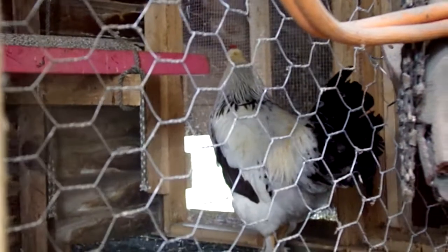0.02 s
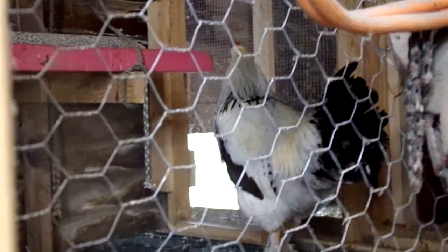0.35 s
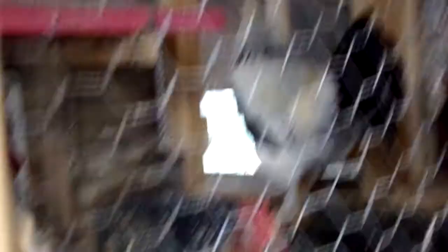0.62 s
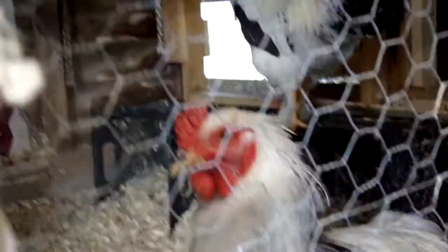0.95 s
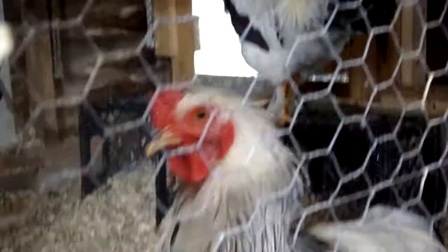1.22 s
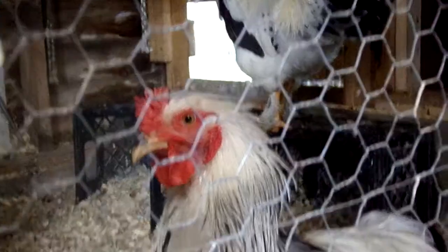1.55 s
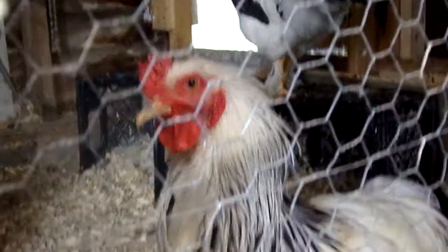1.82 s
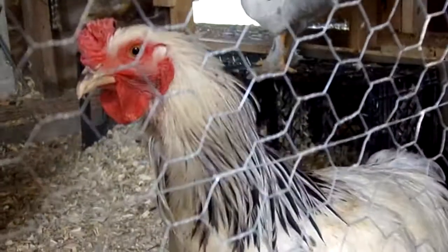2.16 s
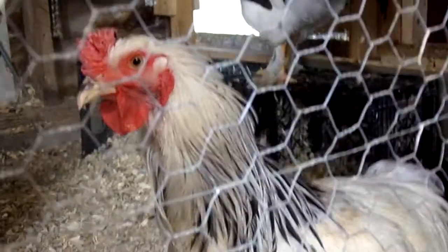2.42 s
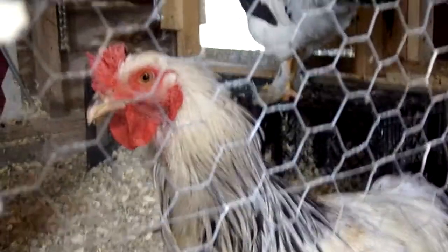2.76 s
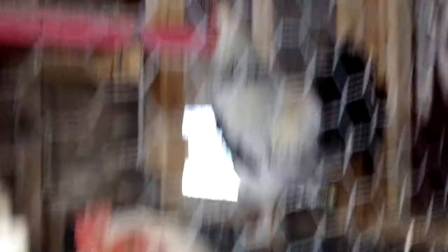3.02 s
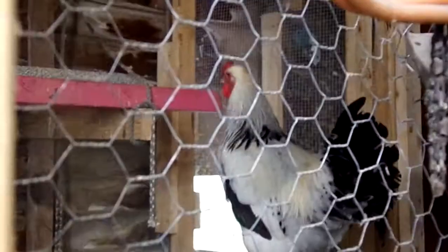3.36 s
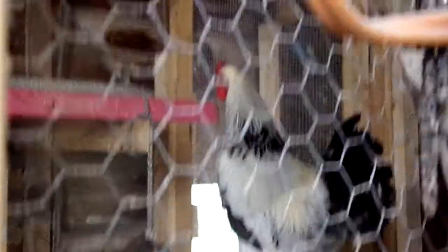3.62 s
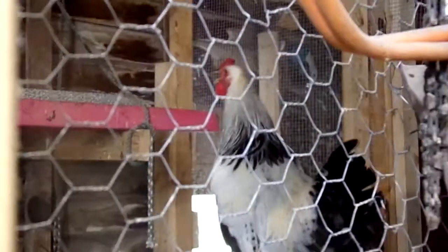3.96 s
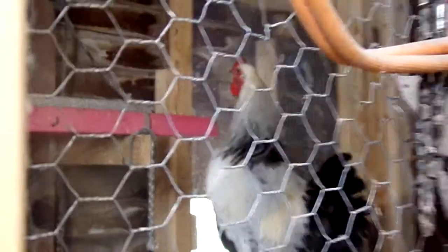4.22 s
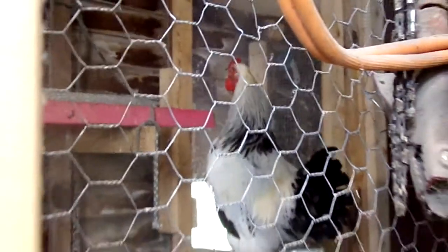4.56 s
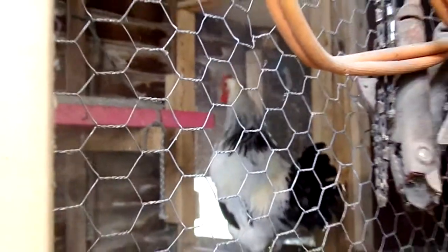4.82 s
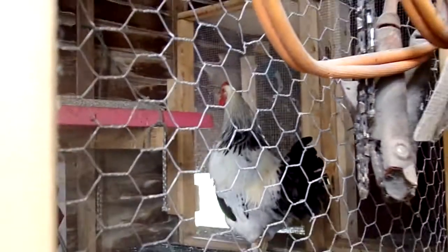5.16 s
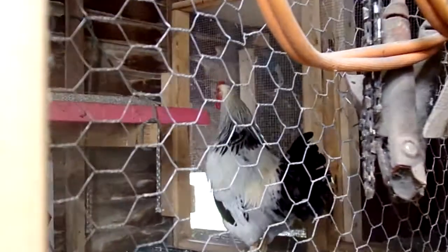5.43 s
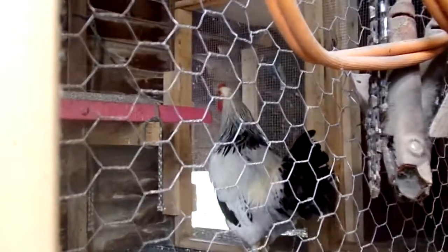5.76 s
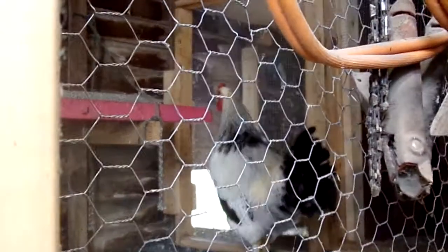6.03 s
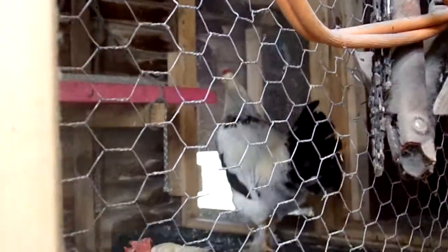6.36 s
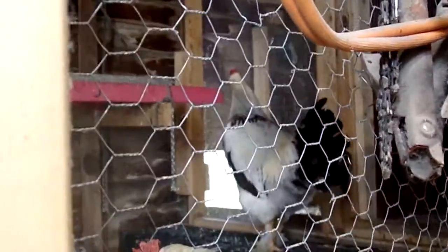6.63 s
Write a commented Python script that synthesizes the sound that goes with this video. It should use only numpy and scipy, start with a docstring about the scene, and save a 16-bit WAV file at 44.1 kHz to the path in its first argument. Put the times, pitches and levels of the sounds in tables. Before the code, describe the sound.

A steady, quiet low noise with a faint hum runs for the whole seven seconds or so, inside a small wooden coop. Right at the start there is a soft, dull bump on the boards. At about 2.5 seconds come two faint, thin falling whistles, the first very short. At about 3.8 seconds a rooster, a step or two from the microphone, begins one loud, harsh crow. It opens with two short arching syllables, moves into a rough rasp from 4.2 to 4.6 seconds, then flips quickly between clear notes and rasps. From about 5.6 seconds it holds a clearer note that sags in pitch and closes with a short rasp at 6 seconds. The coop adds a brief, close reverberation. A small wooden tick sounds at about 6.6 seconds over the continuing background.

```python
"""A rooster crows once in a small wooden coop, a step or two away.
His syrinx is a nonlinear oscillator: periodic motion gives clear harmonic notes, chaotic motion a
harsh rasp shaped by the throat's resonances. He flips between the two, and the boards ring briefly.
Behind him: steady low noise with a hum, a dull bump at the start, two faint falling whistles
and a small tick near the end."""
import sys
import numpy as np
from scipy import signal
from scipy.fft import rfft, irfft
from scipy.io import wavfile
from scipy.ndimage import uniform_filter1d, minimum_filter1d

SR = 44100
rng = np.random.default_rng(int(sys.argv[2]) if len(sys.argv) > 2 else 0)


def inscribe(sig):
    """Save sig as 16-bit PCM at rate SR to the path in sys.argv[1].

    A 1-D sig is mono; a 2-D sig holds one channel per row.
    Samples are clipped to [-1, 1] before scaling.
    """
    pcm = np.round(np.clip(np.atleast_2d(sig).T, -1, 1) * 32767)
    wavfile.write(sys.argv[1], SR, pcm.astype(np.int16))


N = 298998

# formants of the open throat: (frequency [Hz], width [Hz], relative level [dB])
OPEN_FORMANTS = [(610, 53, -2.5), (760, 147, -3.5), (1120, 260, -9), (1306, 58, 4), (1454, 260, -6.5),
                 (1820, 190, -8), (2130, 680, -22.5), (2737, 118, -16.5), (4090, 210, -12.5),
                 (4987, 370, -21), (5920, 220, -26), (6830, 1200, -35.5), (8580, 670, -44),
                 (13700, 7700, -52)]


def gain_of(db):
    """Amplitude ratio: a factor of ten for every 20 dB."""
    return 10 ** (np.asarray(db) / 20)


def unit_rms(x):
    """Normalisation to a mean power of 1."""
    return x / np.sqrt(np.mean(x ** 2) + 1e-20)


def curve_at(points, hz):
    """Linear interpolation on a log-frequency axis."""
    f, value = np.transpose(points)
    return np.interp(np.log(hz + 1), np.log(f + 1), value)


def add(mix, start_s, sound):
    """Superposition: a sound joins the mix at its start time."""
    part = mix[max(round(start_s * SR), 0):][:len(sound)]
    part += sound[:len(part)]


def faded(x, attack_s, release_s):
    """Trapezoidal envelope: linear attack, hold, linear release."""
    t = np.arange(len(x)) / SR
    return x * np.minimum(t / attack_s, 1) * np.minimum(t[::-1] / release_s, 1)


def wander(rate_hz, size):
    """Random modulation: noise of rms 1, low-passed by a Gaussian of width rate_hz."""
    points, step = 2 ** 14, 16
    hz = np.fft.rfftfreq(points, step / SR)
    slow = unit_rms(irfft(rfft(rng.standard_normal(points)) * np.exp(-(hz / rate_hz) ** 2)))
    return np.interp(np.arange(size) / step % points, np.arange(points), slow)


def coloured(x, response, size=4096):
    """Minimum-phase filter: the phase follows from the gain response(hz) by a Hilbert transform."""
    hz = abs(np.fft.fftfreq(size, 1 / SR))
    log_gain = np.log(np.maximum(response(hz), 1e-5))
    taps = np.fft.ifft(np.exp(np.conj(signal.hilbert(log_gain)))).real
    return signal.oaconvolve(x, taps[:size // 2])[:len(x)]


def background(noise_db=-50.14, patchy_db=0.5):
    """A continuous spectrum of low noise, drifting in patches, under the line spectrum of a hum."""
    # noise spectrum: (frequency [Hz], relative density [dB])
    noise_spectrum = [(25, -41), (75, -5), (120, -9), (300, -2), (480, -3.5), (610, -0.5), (1200, -6),
                      (2000, -8.5), (2550, -7), (4000, -18), (7400, -33.5), (8900, -29.5), (10500, -43.5),
                      (15500, -31)]
    # hum partials: (frequency [Hz], relative level [dB])
    hum_partials = [(75, -78.5), (150.7, -66.5), (229, -71), (301.5, -67), (425.3, -68.5), (608.3, -65),
                    (791.3, -66.5)]
    hz, t = np.fft.rfftfreq(2048, 1 / SR), np.arange(N) / SR
    real, imag, patches = rng.standard_normal((3, N // 512 + 5, len(hz)))
    patches = unit_rms(uniform_filter1d(uniform_filter1d(patches, size=8, axis=0), size=24, axis=1))
    frames = (real + 1j * imag) * gain_of(curve_at(noise_spectrum, hz) + patchy_db * patches)
    noise = unit_rms(signal.istft(frames.T, nperseg=2048, noverlap=1536)[1][:N])
    hum = sum(gain_of(db + 3) * np.sqrt(2) * np.sin(2 * np.pi * f * t + 0.68 * wander(9, N))
              for f, db in hum_partials)
    return gain_of(noise_db) * noise + hum


def whistles(slide_hz_per_s=-1250, fade_db_per_s=-63):
    """Thin, far tones: linear downward chirps with exponential decay."""
    # whistles: (start [s], duration [s], initial pitch [Hz], initial level [dB])
    chirps = [(2.544, .06, 3800, -55), (2.645, .25, 3654, -50)]
    out = np.zeros(N)
    for start, length, pitch_hz, db in chirps:
        t = np.arange(0, length, 1 / SR)
        hz = (pitch_hz + slide_hz_per_s * t) * (1 + 0.0032 * wander(80, len(t)))
        tone = gain_of(db + fade_db_per_s * t) * np.sin(2 * np.pi * np.cumsum(hz) / SR)
        add(out, start, faded(tone, .01, .01))
    return out


def knocks(click_t60_s=.05, edge_s=0.00078):
    """Impact excitation: each knock gives a click and sets the boards' damped modes ringing."""
    # knocks on the boards: (time [s], level [dB], relative click level [dB])
    impacts = [(0.0, -34, -8), (6.605, -51, 9.5)]
    # modes of the boards: (frequency [Hz], relative level [dB], decay time T60 [s])
    board_modes = [(83, -8, 0.17), (149.7, -5.5, 0.22), (223, 4, 0.091), (392, -7.5, 0.16), (506, -5, 0.11),
                   (619, 1.5, 0.12), (1030, -11, 0.11)]
    out, t = np.zeros(N), np.arange(SR // 2) / SR
    click_band = signal.butter(2, [700, 2200], "band", fs=SR, output="sos")
    for start, db, click_db in impacts:
        ring = sum(gain_of(level - 60 * t / t60) * np.sin(2 * np.pi * (hz * t + rng.random()))
                   for hz, level, t60 in board_modes)
        click = unit_rms(signal.sosfilt(click_band, rng.standard_normal(len(t))))
        click *= gain_of(click_db - 60 * t / click_t60_s)
        add(out, start, gain_of(db) * faded(ring + click, edge_s, edge_s))
    return out


def coop(x, wet_db=-8.5, build_s=0.025, spacing=20):
    """Reverberation: reflections off close boards build up, then each band decays at its own rate."""
    # decay of the coop: (frequency [Hz], reverberation time T60 [s])
    decay_times = [(300, 0.45), (650, 0.47), (1300, 0.34), (4000, 0.35), (8000, 0.33), (15000, 0.08)]
    echoes = np.zeros(SR)
    slots = np.arange(10 * spacing, SR - spacing, spacing)  # one reflection in each slot of samples
    strengths = rng.choice([-1, 1], len(slots)) * np.minimum(slots / SR / build_s, 1)
    echoes[slots + rng.integers(0, spacing, len(slots))] = strengths
    hz, t, frames = signal.stft(echoes, SR, nperseg=256)
    decay = gain_of(-60 * t / curve_at(decay_times, hz)[:, None])
    tail = signal.istft(frames * decay, SR, nperseg=256)[1]
    return x + gain_of(wet_db) * signal.fftconvolve(x, tail / np.linalg.norm(tail))[:N]


def rasp(size, formants, lock, low_cut_hz, pulse_hz=638.7, lock_hz=253.1, jitter=.4, hiss=0.63):
    """Source and filter: chaotic syrinx pulses, at times half locked to a slow cycle, ring the throat."""
    turns = np.cumsum(pulse_hz * (1 + jitter * wander(500, size))) / SR
    pulses = np.diff(np.floor(turns), prepend=0) * (1 + 0.14 * wander(640, size))
    puffs = np.exp(-(turns % 1) / 0.47) * rng.standard_normal(size)
    slow_phase = 2 * np.pi * np.cumsum(lock_hz * (1 + 0.017 * wander(77, size))) / SR
    locked = sum(np.cos(k * slow_phase + 2 * np.pi * rng.random()) for k in range(3, 8))
    drive = unit_rms(pulses - pulses.mean()) + hiss * unit_rms(puffs) + lock * unit_rms(locked)

    def throat(f):
        """Formants add in power; a high-pass slope removes the bass."""
        power = sum(gain_of(db) ** 2 / (1 + ((f - hz) / (width * 0.59)) ** 2) ** 2.36
                    for hz, width, db in formants)
        return np.sqrt(power / (1 + (low_cut_hz / (f + 1)) ** 10))
    return unit_rms(coloured(drive, throat))


def clear_voice(hz, rough, first_db, octave_db, overtones_db, spectrum, dull_db_per_octave):
    """Periodic motion of the syrinx gives a harmonic series; roughness adds pitch jitter and rasp."""
    size = len(hz)
    jitter = 0.002 * wander(47, size) + 0.011 * rough * wander(220, size)
    phase = 2 * np.pi * np.cumsum(hz * (1 + jitter)) / SR
    overtones = np.zeros(size)
    for k in range(3, 26):
        waver_db = 4.5 * wander(16, size)  # each overtone swells and sinks at random
        db = curve_at(spectrum, k * hz) - dull_db_per_octave * np.log2(k) + waver_db
        overtones += gain_of(db) * np.cos(k * phase)
    overtones /= np.sqrt(uniform_filter1d(overtones ** 2, size=900))  # running rms of 1
    voice = np.sqrt(2) * (gain_of(first_db) * np.cos(phase) + gain_of(octave_db - 3) * np.cos(2 * phase))
    shimmer_db = 1.5 * wander(90, size)
    voice += gain_of(overtones_db + shimmer_db) * overtones
    grit = rasp(size, OPEN_FORMANTS, lock=0, low_cut_hz=4300)
    return voice + rough * gain_of(overtones_db + 3) * grit


def opening_syllables(arch_per_s2=12.5, crest_width_s=0.029, edge_rough=.6):
    """Frequency modulation: the pitch traces a parabolic arch, and the voice is clearest at its crest."""
    # syllables: (start [s], end [s], crest time [s], crest pitch [Hz], crest roughness [0-1],
    # relative level [dB], level change [dB], relative overtone level [dB], thinning at the crest [dB])
    syllables = [(3.794, 3.962, 3.886, 659.7, 0, -7.5, 0.5, -32, 24),
                 (4.098, 4.244, 4.142, 765.7, 0.33, -9.5, -10.5, -30, -2.5)]
    # spectral envelope of the overtones: (frequency [Hz], relative level [dB])
    spectrum = [(1950, -18), (2600, -25.5), (3300, -33), (3950, 0.5), (4600, -27), (5300, -18.5),
                (5950, -15), (6700, -38), (8200, -34), (9200, -28.5), (10200, -43), (15500, -60)]
    out = np.zeros(N)
    for start, end, crest_s, crest_hz, crest_rough, db, change_db, overtones_db, thin_db in syllables:
        t = np.arange(0, end - start, 1 / SR)
        from_crest = start + t - crest_s
        crest = np.exp(-(from_crest / crest_width_s) ** 2)
        hz = crest_hz * (1 - arch_per_s2 * from_crest ** 2)
        rough = edge_rough + (crest_rough - edge_rough) * crest
        level = db + change_db * t / t[-1]
        thin = thin_db * crest  # shifts strength from the two lowest partials to the overtones
        voice = clear_voice(hz, rough, level - thin, level - 1 - 0.16 * thin,
                            overtones_db + 0.47 * thin, spectrum, dull_db_per_octave=rough)
        add(out, start, faded(voice, attack_s=0.031, release_s=0.025))
    return out


def held_notes(sharp_hz=8.94, settle_s=0.028, bend_s=0.0302):
    """Sustained oscillation: a note starts sharp, settles, then bends, roughens and dulls as it breaks."""
    # clear notes: (start [s], end [s], pitch [Hz], final bend [Hz], roughness [0-1],
    # relative levels of fundamental [dB], octave [dB] and overtones [dB], mellowing [dB])
    notes = [(4.627, 4.799, 672, 27.5, 0, -24, -12.5, -20.5, 3),
             (4.874, 4.96, 681.8, 11.5, 0, -29, -10.5, -27, -1),
             (5.096, 5.184, 675.8, 14.5, 0.01, -31, -8.5, -22.5, 8),
             (5.587, 5.942, 658.4, -43.5, 0, -23.5, -13.5, -28, 9)]
    # spectral envelope of the overtones: (frequency [Hz], relative level [dB])
    spectrum = [(1950, -25.5), (2680, -17), (3400, -22.5), (3930, 2.5), (4100, 3.5), (4620, -29.5),
                (4780, -11), (5400, -24), (6000, -44), (6600, -16), (6850, -26.5), (7500, -26), (8900, -25),
                (10700, -36.5), (14000, -38.5), (15500, -45.5)]
    out = np.zeros(N)
    for start, end, pitch_hz, bend_hz, rough, first_db, octave_db, overtones_db, mellow_db in notes:
        t = np.arange(0, end - start, 1 / SR)
        breaking = np.exp(-t[::-1] / bend_s)
        hz = pitch_hz + sharp_hz * np.exp(-t / settle_s) + bend_hz * breaking
        mellow = mellow_db * (t / t[-1] - .5)  # a closing beak favours the fundamental
        voice = clear_voice(hz, rough + 0.23 * breaking, first_db + mellow, octave_db,
                            overtones_db - mellow, spectrum, dull_db_per_octave=7 * breaking)
        add(out, start, faded(voice, attack_s=0.042, release_s=0.014))
    return out


def harsh_bursts():
    """Chaotic oscillation: throat shape sets each rasp's formants; a widening beak adds treble."""
    # formants of the tight and the closing throat: (frequency [Hz], width [Hz], relative level [dB])
    tight_formants = [(573, 83, -9), (762, 172, -9.5), (1065, 163, -9.5), (1258, 89, 2.5), (1390, 56, -3),
                      (1510, 75, -15.5), (1726, 196, -6), (2510, 340, -30), (3510, 110, -32),
                      (4006, 434, -17), (4805, 200, -24), (5590, 460, -31.5), (6513, 320, -26.5),
                      (7480, 400, -32.5), (9060, 1640, -38.5), (13800, 14000, -52)]
    closing_formants = [(350, 510, -25), (592, 145, 4), (1256, 143, 8), (1780, 115, -0.5), (3760, 420, -24),
                        (6000, 3800, -35.5)]
    # rasps: (start [s], end [s], attack [s], relative level [dB], level change [dB],
    # treble gain [dB], treble change [dB], throat shape)
    bursts = [(3.771, 3.858, 0.0061, -19, 2, -1.5, 5, "tight"),
              (3.929, 4.033, .008, -21, -4, -5.5, -8, "tight"),
              (4.086, 4.153, 0.017, -14.5, 0.5, -1, 25, "open"),
              (4.209, 4.642, .055, -11.5, -1.5, 2, 6, "open"), (4.781, 4.924, 0.02, -13, 0, 1, 4, "tight"),
              (4.947, 5.148, 0.018, -14, -1, 2, -1.5, "tight"),
              (5.168, 5.328, 0.021, -12.5, -2.5, -1.5, 4, "tight"),
              (5.297, 5.634, 0.034, -13.5, -2.5, 0.5, 3, "tight"),
              (5.92, 5.985, 0.015, -17, 0.5, -1, -3, "closing")]
    throats = {"open": dict(formants=OPEN_FORMANTS, lock=0, low_cut_hz=454),
               "tight": dict(formants=tight_formants, lock=0.17, low_cut_hz=200),
               "closing": dict(formants=closing_formants, lock=0, low_cut_hz=220)}
    treble_band = signal.butter(2, 3300, "high", fs=SR, output="sos")
    out = np.zeros(N)
    for start, end, attack_s, db, change_db, treble_db, brighten_db, shape in bursts:
        t = np.arange(0, end - start, 1 / SR)
        progress = t / t[-1]
        voice = rasp(len(t), **throats[shape])
        treble = signal.sosfiltfilt(treble_band, voice)
        voice += (gain_of(treble_db + brighten_db * (progress - .5)) - 1) * treble
        voice *= gain_of(db + change_db * progress)
        add(out, start, faded(voice, attack_s, release_s=0.051))
    return out


def rooster():
    """Periodic and chaotic regimes of the syrinx alternate to make one crow."""
    return gain_of(-1.84) * (opening_syllables() + held_notes()) + gain_of(-.5) * harsh_bursts()


def scene():
    """Superposition: crow, whistles and knocks reverberate in the coop, over the background."""
    return (coop(rooster() + whistles() + knocks()) + background())[None]


def record(dry, threshold=.88, cutoff_hz=15750):
    """Transfer chain: the microphone's notches, a quick peak limiter, then a low-pass band limit."""
    # notches in the microphone's response: (frequency [Hz], half-width [Hz], gain [dB])
    notches = [(3660, 50, -14), (4390, 80, -15), (8080, 200, -16), (11800, 280, -20)]
    heard = coloured(dry[0], lambda f: gain_of(sum(db / (1 + ((f - hz) / width) ** 2)
                                                   for hz, width, db in notches)))
    limiter_gain = minimum_filter1d(threshold / np.maximum(abs(heard), threshold), size=441)
    heard *= uniform_filter1d(uniform_filter1d(limiter_gain, size=221), size=221)
    low_pass = signal.firwin(511, cutoff_hz, window=("kaiser", 9), fs=SR)
    return signal.oaconvolve(heard, low_pass, "same")[None]


dry = scene()
out = record(dry)
inscribe(out)
```